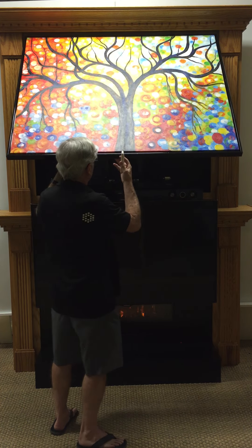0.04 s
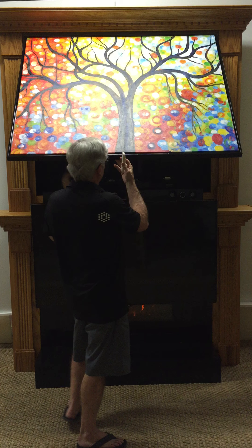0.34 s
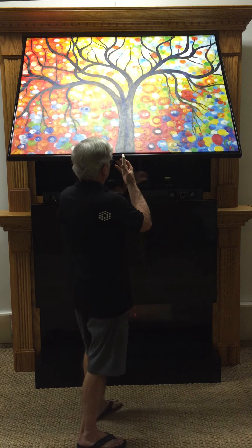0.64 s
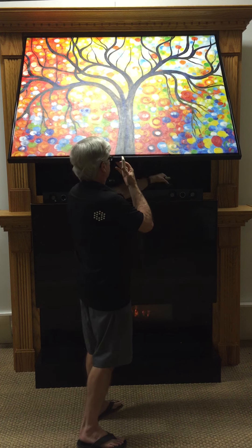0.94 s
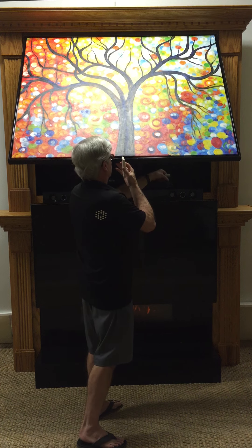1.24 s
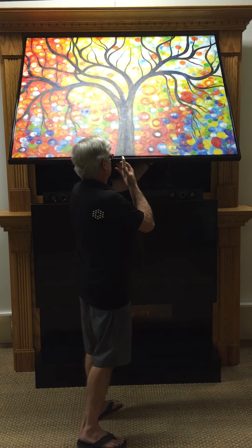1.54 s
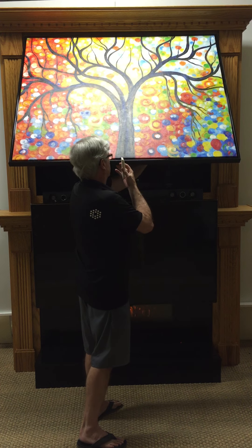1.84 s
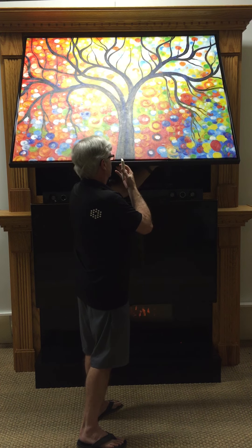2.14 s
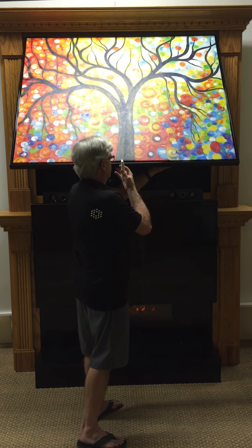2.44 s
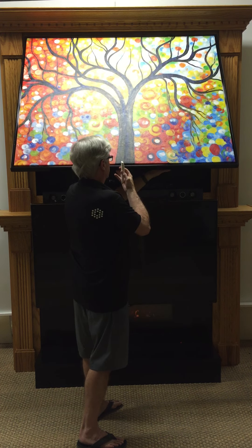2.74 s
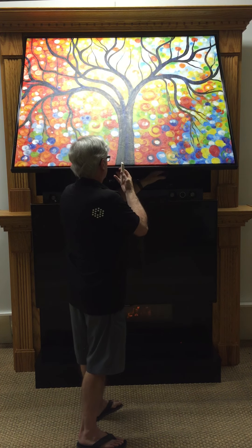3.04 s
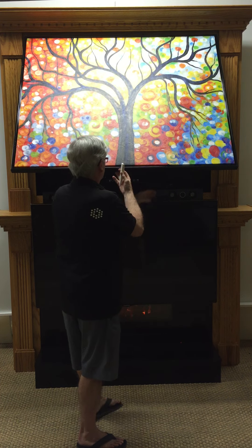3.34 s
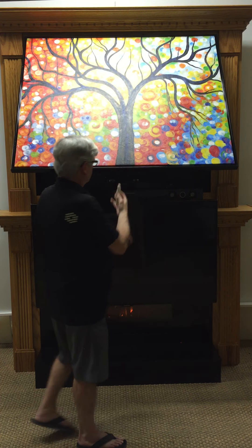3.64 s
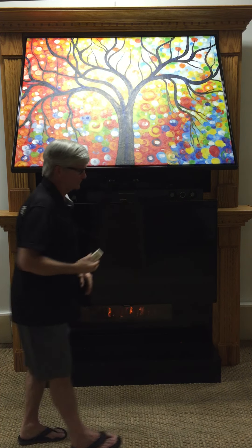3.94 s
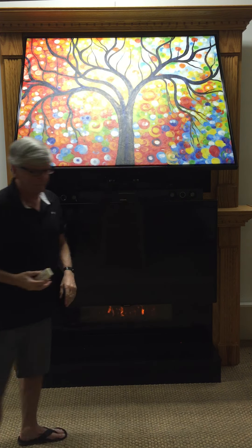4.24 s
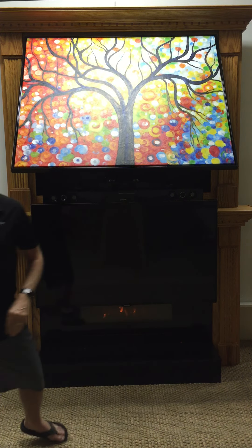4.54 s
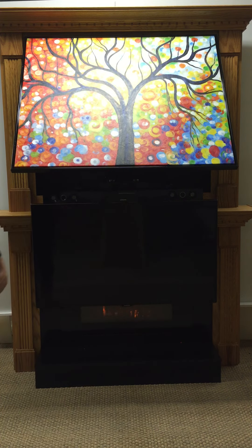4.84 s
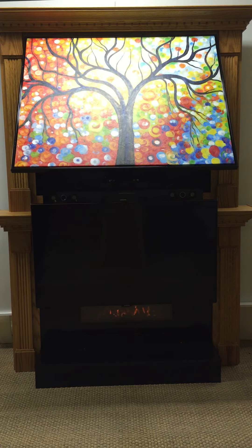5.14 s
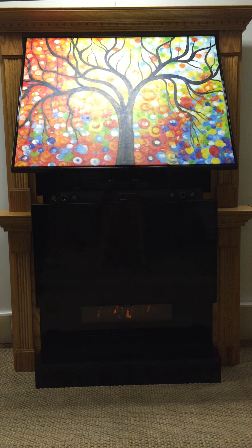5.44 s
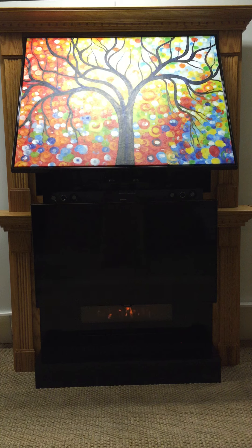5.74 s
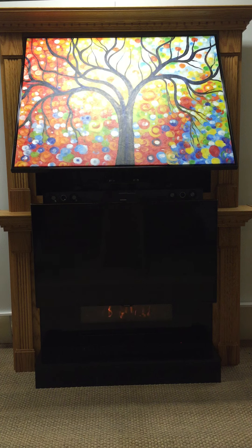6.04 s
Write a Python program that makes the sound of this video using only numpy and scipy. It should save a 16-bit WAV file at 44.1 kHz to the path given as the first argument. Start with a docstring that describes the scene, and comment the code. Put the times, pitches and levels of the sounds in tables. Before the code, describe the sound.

A large panel is pulled down on a steel mount with a scrape and several knocks, then someone walks off softly in sandals.

```python
"""A sandal scuffs and a frame knocks over the low hum of a fan in a carpeted living room.
A big framed panel is pulled down by hand on its steel wall mount. Blows excite the damped modes of
frame, panel and arms; stick-slip friction makes the rail scrape and sing. The mount clacks against
its end stop and settles with two more bumps. Then someone walks off, sandals thudding on the carpet
and slapping the heels, clothes rustling as their folds give way."""
import sys
import numpy as np
from scipy import signal
from scipy.fft import rfft, irfft, next_fast_len
from scipy.io import wavfile
from scipy.ndimage import map_coordinates

SR = 44100
rng = np.random.default_rng(int(sys.argv[2]) if len(sys.argv) > 2 else 0)


def wrap_up_sound(samples):
    """Save the sound to the file named by the first command line argument, as 16-bit audio."""
    columns = np.atleast_2d(samples).T
    # keep every value between -1 and 1, then stretch to whole-number steps
    tamed = np.clip(columns, -1, 1)
    steps = np.round(tamed * 32767).astype(np.int16)
    wavfile.write(sys.argv[1], SR, steps)


N = 277830
T = np.arange(SR * 7 // 10) / SR  # time axis of one decay [s]

# reverberation of the room: (frequency [Hz], t60 [s])
ROOM_DECAY = [(100, 0.98), (260, 0.44), (700, 0.58), (1840, 0.41), (4850, 0.53), (12800, 0.35)]
# spectrum of the fan's airflow: (frequency [Hz], relative density [dB])
AIR_SPECTRUM = [(25, -26.5), (45, -14), (64, 1), (85, -9), (120, -2.5), (160, -7), (240, -8), (340, -23),
                (550, -20.5), (1000, -30), (2400, -28.5), (4500, -35.5), (10000, -41.5), (15800, -43)]
# hum and whines of the fan: (frequency [Hz], width [Hz], level [dB])
FAN_TONES = [(110.3, 19, -58.5), (1403, 20, -83), (2790, 12, -86.5), (2970, 28, -88)]
# spectrum of rustling cloth: (frequency [Hz], relative density [dB])
CLOTH_SPECTRUM = [(200, -22), (900, 7.5), (3000, 1), (7000, -3.5), (15000, -15)]
# swishes of clothes: (peak time [s], level [dB], half length [s], treble gain [dB])
CLOTH_SWISHES = [(0.702, -66.5, 0.057, 4), (0.893, -71.5, .05, 14), (3.484, -69.5, 0.032, 19.5),
                 (4.001, -54, 0.031, 15), (4.053, -59.5, 0.054, 0), (4.435, -67.5, 0.14, 12),
                 (5.293, -67.5, .08, -4)]
# a sandal lands on the carpet: (time [s], thud [dB], scuff [dB], scuff pitch [Hz])
SOLE_LANDINGS = [(0.005, -57, -65.5, 2020), (3.551, -62.5, -69.5, 1500), (3.798, -62, -68.5, 600),
                 (4.315, -61, -70, 1500), (4.37, -60.5, -66.5, 958), (4.673, -61.5, -63.5, 900),
                 (5.185, -62.5, -64.5, 990), (5.435, -63, -72.5, 706), (5.896, -59.5, -62, 1370)]
# a sandal slaps the heel: (time [s], slap [dB], pitch [Hz], hiss [dB], peel [dB])
HEEL_SLAPS = [(0.036, -58.5, 810, -63.5, -60.5), (3.862, -66.5, 2720, -78, -69.5),
              (4.085, -61.5, 1940, -76, -75), (4.675, -56, 2560, -67.5, -61.5),
              (5.026, -57.5, 3400, -62.5, -82), (5.368, -63, 1110, -64.5, -65.5),
              (6.012, -50, 2200, -83, -58)]
# sliding speed along the rail: (time [s], speed re full speed [dB])
SLIDE_SPEED = [(1.275, -46), (1.305, -21), (1.35, -8), (1.385, -5), (1.49, -2.5), (1.55, 0.5), (1.59, -3),
               (1.64, 0), (1.72, -5.5), (1.81, -6.5)]
# drag, scrape and grit bands: (relative level at full speed [dB], growth with speed [dB/dB])
FRICTION_BANDS = [(-31.5, 0.62), (-29, 1.3), (-31, 2.34)]
# spectrum of the rail's friction: (frequency [Hz], relative density [dB])
FRICTION_SPECTRUM = [(40, -9), (110, -8.5), (300, -3), (600, -8), (750, -5.5), (1200, -0.5), (1600, -3.5),
                     (1780, -6), (2400, -7.5), (3400, -7), (4250, -10.5), (5200, -5), (7600, -9.5),
                     (15800, -12)]
# resonances of the rubbed rail: (frequency [Hz], width [Hz], gain [dB])
RAIL_MODES = [(270, 70, 7), (410, 130, 9), (565, 60, 9), (935, 50, 10), (1090, 80, 11), (1310, 60, 12),
              (2150, 130, 4), (3100, 100, 7), (3490, 90, 6), (3850, 80, 8), (4600, 110, 2), (5570, 120, 4),
              (8610, 120, 3), (9500, 150, 2)]
# thin ringing tones of the rail: (frequency [Hz], width [Hz], relative level [dB])
RAIL_TONES = [(935, 16, -49), (1313, 28, -45), (3500, 30, -53), (3870, 35, -52), (5118, 25, -44),
              (6575, 20, -49), (6985, 30, -54), (10864, 18, -54), (11068, 22, -55)]
# the rail catches: (time [s], level [dB])
RAIL_CATCHES = [(1.353, -51.5), (1.438, -48), (1.516, -47), (1.538, -37.5), (1.611, -37.5)]
# resonances of the frame: (frequency [Hz], width [Hz], gain [dB])
FRAME_MODES = [(240, 90, 2), (390, 140, 3), (935, 60, 0), (1080, 60, 1), (1315, 45, 5), (1595, 60, 3),
               (2500, 200, 0), (3110, 110, 3), (3540, 100, 4), (3860, 90, 3), (6050, 600, 2)]
# the panel sways on the wall: (frequency [Hz], level re thump [dB], t60 [s])
SWAY_MODES = [(64.8, 0.5, .55), (99.1, -1, 0.93), (186.2, -5.5, 0.68)]
# ring of the mount's arms: (frequency [Hz], relative level [dB], t60 [s])
ARM_MODES = [(2482, -7, .35), (3100, -6, .4), (3540, -2, .35), (3580, -5, .45), (3825, -5, .5),
             (3850, -3, .55), (3885, -3, .7), (4690, -10, .45), (6100, -9, .4), (6985, -11, .4)]
# ring of the whole steel mount: (frequency [Hz], relative level [dB], t60 [s])
MOUNT_MODES = [(425, 0, .5), (461, 0, .45), (541, -2, .45), (618, -3, .45), (825, -1, .36), (846, -2, .36),
               (1067, 0, .35), (1315, 1, .4), (1420, -1, .36), (1598, -2, .4), (1629, -3, .45),
               (2423, -6, .62), (3784, -9, .4), (4021, -8, .41), (4495, -13, .62), (5125, -9, .52),
               (5685, -10, .35), (9921, -16, .3), (11790, -12, .24)]
# the arms take up their slack: (time [s], level [dB])
SLACK_TICKS = [(0.134, -61), (2.344, -48.5)]
# blows on the frame: (time [s], wall thump [dB], panel knock [dB], steel clack [dB], arm ring [dB],
# hardness as treble cutoff [Hz], panel boom [Hz])
FRAME_BLOWS = [(0.155, -44, -43, -48, -73, 40000, 210), (1.061, -67, -43.5, -49.5, -55, 9000, 254.4),
               (1.098, -75, -49.5, -62, -82, 3000, 252), (1.813, -40.5, -30, -31.5, -50, 10000, 369.6),
               (2.268, -70, -57.5, -84, -84, 1000, 435), (2.354, -43, -38, -44.5, -48.5, 9000, 254.1),
               (2.937, -48, -41, -62, -55.5, 3800, 330), (3.016, -47, -38.5, -41, -46.5, 2600, 442),
               (3.038, -38.5, -37, -50.5, -59, 5540, 325.4)]


def amp(db):
    """Decibels to amplitude ratio."""
    return np.exp(np.log(10) / 20 * np.asarray(db))


def unit(x):
    """Scale to rms 1."""
    return x / np.sqrt(np.mean(x ** 2) + 1e-20)


def at_level(hit, db):
    """Equivalent level: scale a hit so that its energy, spread over 80 ms, has this level."""
    return amp(db) * np.sqrt(.08 * SR) / np.linalg.norm(hit) * hit


def add(track, s, sound):
    """Superposition: mix a sound into the track at time s."""
    part = track[max(round(s * SR), 0):][:len(sound)]
    part += sound[:len(part)]


def along(points, hz):
    """Interpolate (frequency [Hz], value) points on a logarithmic frequency axis."""
    f, values = np.transpose(points)
    return np.interp(np.log(hz + 1), np.log(f + 1), values)


def filtered(x, response):
    """Linear filtering: multiply the spectrum by a frequency response."""
    size = next_fast_len(len(x) + 2048, True)
    return irfft(rfft(x, size) * response(np.fft.rfftfreq(size, 1 / SR)), size)[:len(x)]


def split(x, edges_hz):
    """Band-pass filtering between each pair of neighbouring edges."""
    return [signal.sosfilt(signal.butter(3, band, "band", fs=SR, output="sos"), x)
            for band in zip(edges_hz, edges_hz[1:])]


def resonances(modes, f):
    """Forced response of damped oscillators, summed over the modes."""
    return sum(amp(db) * 1j * f * width / (hz * hz - f * f + 1j * f * width) for hz, width, db in modes)


def peak(f, hz, width):
    """Lorentzian line shape of height 1."""
    return 1 / (1 + (2 * (f - hz) / width) ** 2)


def fuzzy_tones(lines):
    """Narrow-band noise: sharp resonances driven at random."""
    def response(f):
        return sum(amp(db) * np.sqrt(2 * SR / (np.pi * w)) * peak(f, hz, w) for hz, w, db in lines)
    return filtered(rng.standard_normal(N), response)


def ring(modes, rise):
    """Free vibration: modes swell as the room takes them up, then decay exponentially."""
    tones = sum(amp(db - 60 * T / t60) * np.sin(2 * np.pi * (hz * T + rng.random()))
                for hz, db, t60 in modes)
    return tones * (1 - np.exp(-T / rise))


def wobble(rate):
    """Random modulation: a smooth curve with rate knots a second."""
    knots = rng.standard_normal(int(N * rate / SR) + 4)
    return map_coordinates(knots, [np.arange(N) * rate / SR])


def grains(rate):
    """Shot noise: tiny slips of uneven size, on average rate a second."""
    return unit(rng.standard_normal(N) * (rng.random(N) < rate / SR))


def contact(length, rise, size=len(T)):
    """Impact excitation: a burst of micro-impacts builds up and loses 20 dB every length seconds."""
    t = T[:size]
    return rng.standard_normal(size) * amp(-20 * t / length) * (1 - np.exp(-t / rise))


def room(x, direct_db, t60_scale=1):
    """Reverberation: direct sound plus a diffuse tail whose treble is absorbed first."""
    size = min(len(x), len(T))
    hz, t, spectra = signal.stft(rng.standard_normal(size), SR, nperseg=256)
    t60 = t60_scale * along(ROOM_DECAY, hz)[:, None]
    tail = signal.istft(spectra * amp(-60 * t / t60), SR, nperseg=256)[1][:size]
    tail *= 1 - np.exp(-T[:size] / 0.0027)
    return amp(direct_db) * x + signal.fftconvolve(x, tail / np.linalg.norm(tail))[:len(x)]


def fan():
    """Flow noise with a hum and faint whines; amplitude modulation makes bass and tones flutter."""
    air = unit(filtered(rng.standard_normal(N), lambda f: amp(along(AIR_SPECTRUM, f))))
    bass = filtered(air, lambda f: 1 / (1 + (f / 300) ** 4))
    flutter = amp(2.7 * wobble(rate=23))
    return amp(-60.5) * (air - bass + flutter * bass) + flutter * fuzzy_tones(FAN_TONES)


def clothes():
    """Friction noise: folds give way in clumps, faintly during the walk and louder in single swishes."""
    t = np.arange(N) / SR
    creases = grains(rate=980) * amp(2.5 * wobble(rate=77))
    rustle = unit(filtered(room(creases, direct_db=-2), lambda f: amp(along(CLOTH_SPECTRUM, f))))
    treble = filtered(rustle, lambda f: 1 / (1 + (10800 / (f + 1)) ** 4))
    walking = (t > 3.8) & (t < 6.3)
    out = amp(-75) * walking * rustle
    for s, db, half_length, treble_db in CLOTH_SWISHES:
        swell = amp(db) * np.exp(-((t - s) / half_length) ** 2)
        out += swell * (rustle + (amp(treble_db) - 1) * treble)
    return out


def sandal(thud_db, slap_db, hz, hiss_db, rise, length, relative_width=1):
    """Source and filter: one contact gives a low thud, a broad resonance of the sole and a hiss."""
    step = room(contact(length, rise, size=SR // 3), direct_db=-1, t60_scale=0.67)
    thud, hiss = split(step, [95, 420])[0], split(step, [3300, 11000])[0]
    slap = filtered(step, lambda f: resonances([(hz, relative_width * hz, 0)], f) ** 2)
    return at_level(thud, thud_db) + at_level(slap, slap_db) + at_level(hiss, hiss_db)


def footsteps():
    """Damped impacts: soles land on the carpet, peel off it and slap the heels."""
    peel_lead_s, peel_hz = .042, 2300
    out = np.zeros(N)
    for s, thud_db, scuff_db, hz in SOLE_LANDINGS:
        scuff = sandal(thud_db, scuff_db, hz, scuff_db - 7, rise=.0045, length=.05, relative_width=.92)
        add(out, s, scuff)
    for s, db, hz, hiss_db, peel_db in HEEL_SLAPS:
        peel = sandal(peel_db - 12, peel_db, peel_hz, peel_db - 20, rise=.03, length=.071)
        add(out, s - peel_lead_s, peel)
        add(out, s, sandal(db - 13.5, db, hz, hiss_db, rise=.0012, length=.012))
    return out


def rail_response(f):
    """Resonance: the rail's modes add in power and raise peaks on the friction spectrum."""
    mode_power = sum(amp(2 * db) * peak(f, hz, width) ** 2 for hz, width, db in RAIL_MODES)
    return amp(along(FRICTION_SPECTRUM, f)) * np.sqrt(1 + mode_power)


def rail_slide():
    """Stick-slip friction drives the rail: it grows gritty and sings with speed, and at times catches."""
    speed_db = np.interp(np.arange(N) / SR, *np.transpose(SLIDE_SPEED), left=-200, right=-200)
    drag, scrape, grit = (amp(db + growth * speed_db) for db, growth in FRICTION_BANDS)
    slips = grains(rate=900) * amp(3 * wobble(rate=45))  # slips come in uneven clumps
    rub = room(filtered(slips, rail_response), direct_db=-4)
    bands = split(rub, [55, 720, 4150, 17000])
    out = amp(-4.5) * sum(gain * unit(band) for gain, band in zip((drag, scrape, grit), bands))
    for s, db in RAIL_CATCHES:
        catch = filtered(contact(length=0.0081, rise=0.0036, size=SR // 3), rail_response)
        tick = split(catch, [800, 16000])[0]
        add(out, s, at_level(room(tick, direct_db=-7.5, t60_scale=0.86), db))
    add(out, 1.318, ring([(3875, -49, .45)], rise=0.0037))  # the mount's arms squeak briefly at 3875 Hz as the slide gets going
    # the sharp modes store the rubbing energy and let it go slowly
    decay = amp(-60 * T / .18)
    stored = signal.fftconvolve(grit, decay / np.sum(decay))[:N]
    # each tone swells and fades by itself
    tones = sum(fuzzy_tones([line]) * amp(3 * wobble(rate=11.1)) for line in RAIL_TONES)
    return out + amp(32) * stored * tones


def frame_shake(hard_hz, length):
    """Forced vibration of the frame, heard in the room; a softer contact is slower and duller."""
    f = np.fft.rfftfreq(len(T), 1 / SR)
    response = (1 + resonances(FRAME_MODES, f)) / (1 + 1j * f / hard_hz) ** 2
    force = contact(length, rise=16 / hard_hz)
    return room(irfft(rfft(force) * response, len(T)), direct_db=-8)


def rebounds():
    """Inelastic collision: the panel rocks back twice after each blow, losing level in every band."""
    rock_s, firm_knock_db = .084, -37.5
    loss_db = np.array([9, 10.5, 10.5, 21.5])  # per rebound: thump, knock, clank, clack
    for s, thump_db, knock_db, clack_db, _, hard_hz, _ in FRAME_BLOWS:
        clank_db = -43 + 2.04 * (knock_db - firm_knock_db)  # the midrange grows faster than the knock
        band_db = np.array([thump_db, knock_db, clank_db, clack_db])
        for k in range(3):
            yield s + k * rock_s, hard_hz, band_db - k * loss_db


def panel_knocks():
    """Impacts excite the modes of frame, panel and arms; the end stop rings the whole steel mount."""
    lag_s = 0.00502  # the heavy panel follows the steel this much later
    out = np.zeros(N)
    arms = ring(ARM_MODES, rise=0.011)
    for s, hard_hz, (thump_db, knock_db, clank_db, clack_db) in rebounds():
        shake = frame_shake(hard_hz, length=0.019)
        thump, knock, clank, clack = split(shake, [50, 170, 650, 2200, 17000])
        add(out, s, at_level(clank, clank_db) + at_level(clack, clack_db))
        add(out, s + lag_s, at_level(thump, thump_db) + at_level(knock, knock_db))
    for s, thump_db, knock_db, _, arm_db, _, boom_hz in FRAME_BLOWS:
        # the panel's bending mode, whose pitch changes with the grip
        boom = ring([(boom_hz, knock_db + 2.5, 0.58)], rise=0.0031)
        sway = amp(thump_db) * ring(SWAY_MODES, rise=0.023)
        add(out, s + lag_s, boom + sway)
        add(out, s, amp(arm_db) * arms)
    for s, db in SLACK_TICKS:
        tick = split(frame_shake(hard_hz=4000, length=0.0098), [3150, 4500])[0]
        add(out, s, at_level(tick, db))
    crack = split(frame_shake(hard_hz=11000, length=0.0033), [600, 17000])[0]
    end_stop = at_level(crack, db=-29.5) + amp(-30) * ring(MOUNT_MODES, rise=0.005)
    add(out, 1.811, end_stop)
    return out


def scene():
    """Superposition: the pressures of all sources add at one microphone."""
    return (panel_knocks() + rail_slide() + footsteps() + clothes() + fan())[None]


def record(dry):
    """Band limiting: an ideal low-pass filter removes the highest treble."""
    return np.array([filtered(x, lambda hz: hz < 15850) for x in dry])


dry = scene()
out = record(dry)
wrap_up_sound(out)
```